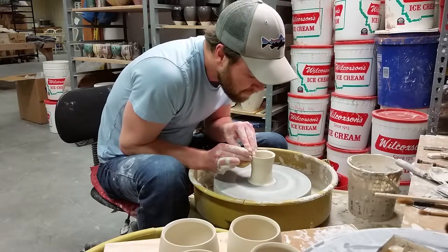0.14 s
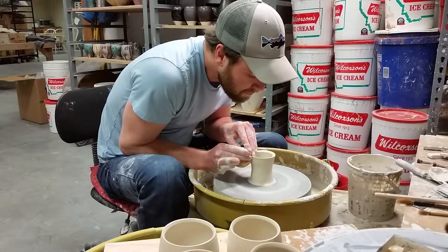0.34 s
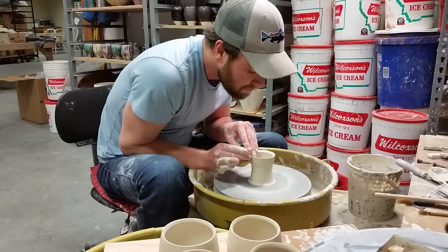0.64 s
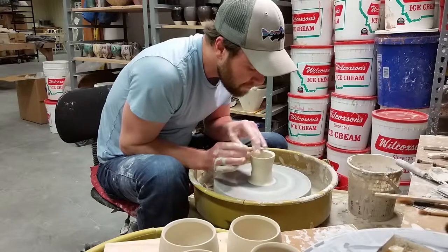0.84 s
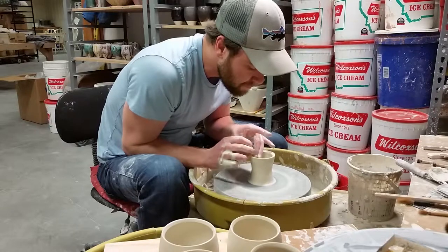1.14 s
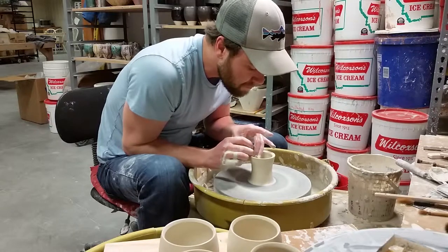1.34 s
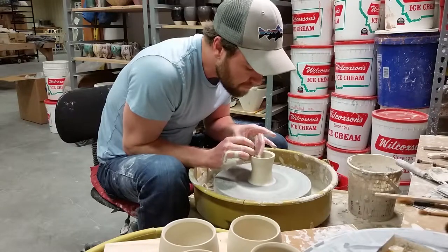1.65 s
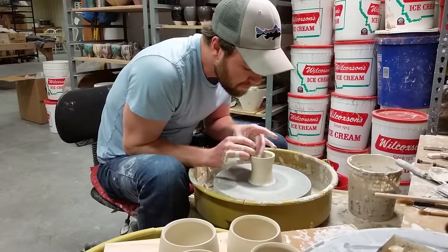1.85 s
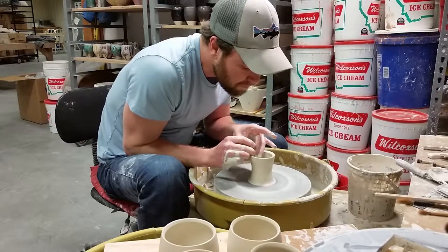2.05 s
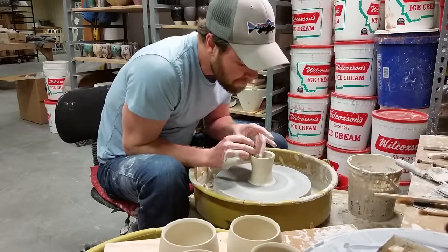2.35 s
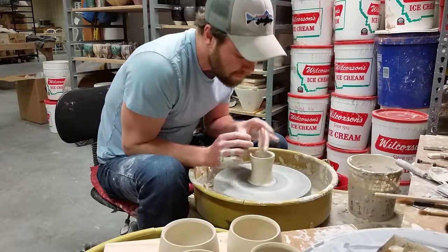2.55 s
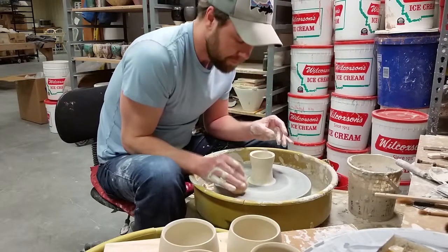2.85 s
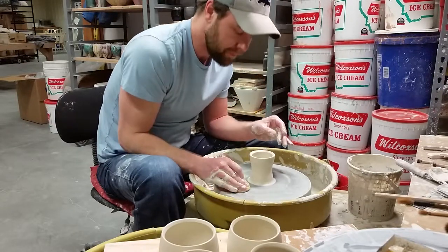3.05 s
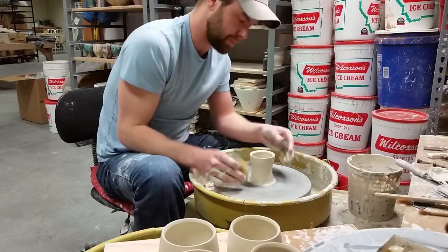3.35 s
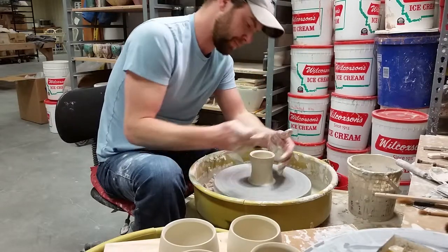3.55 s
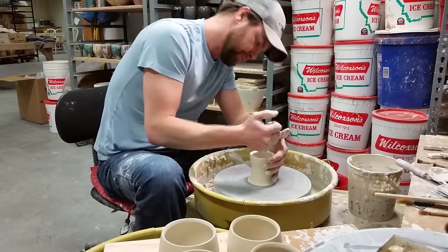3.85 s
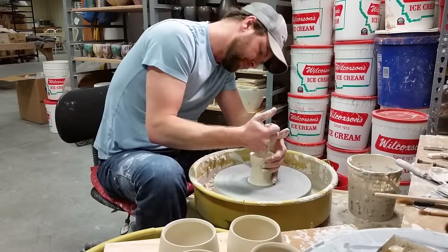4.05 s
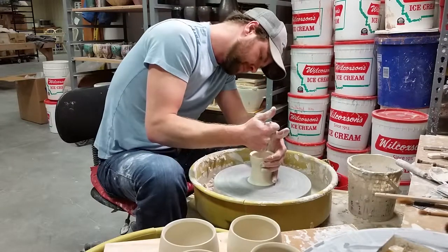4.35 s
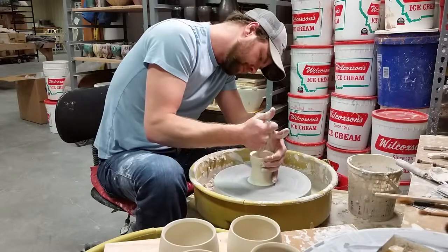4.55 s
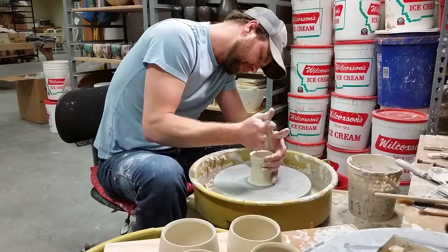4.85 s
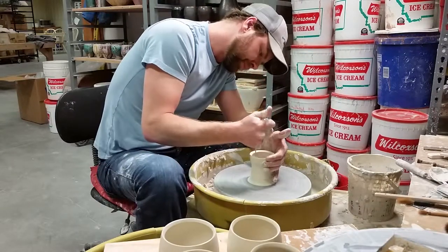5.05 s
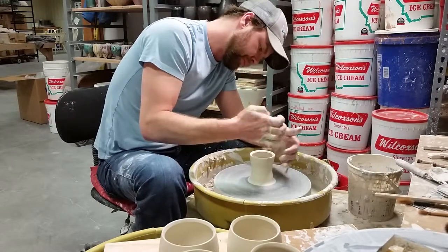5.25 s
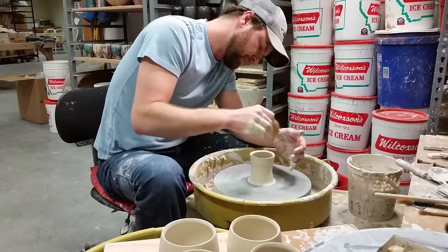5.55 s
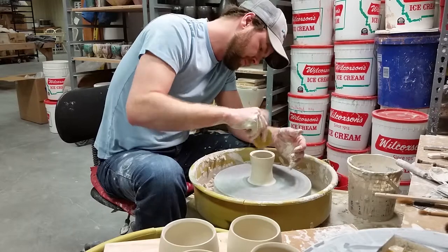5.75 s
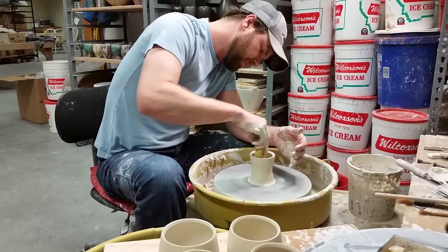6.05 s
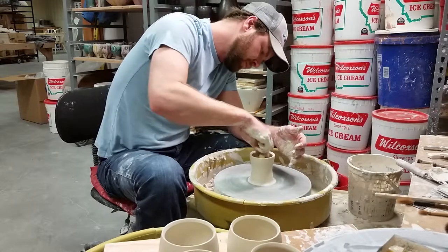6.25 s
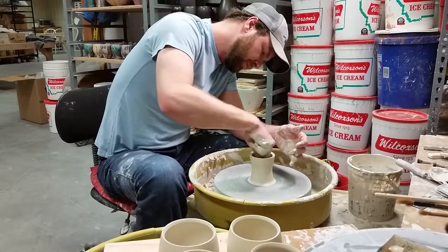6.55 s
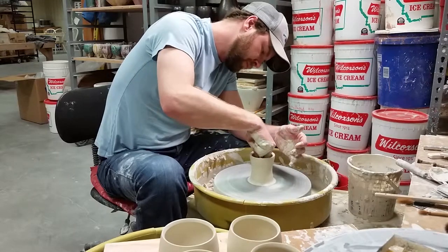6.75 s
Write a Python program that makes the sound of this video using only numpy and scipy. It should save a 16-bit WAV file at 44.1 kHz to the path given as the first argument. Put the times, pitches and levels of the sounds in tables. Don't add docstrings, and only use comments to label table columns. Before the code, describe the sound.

An electric pottery wheel runs throughout in a hard-floored studio, heard close in stereo. Its low hum sits around 150 Hz, with a steadier mid buzz near 375 Hz, weaker tones, soft brush and belt hiss, frame rumble and narrow housing resonance. From 0 to 2.5 seconds it holds nearly steady, the hum dipping briefly now and then. Between 2.5 and 3 seconds a thin whine near 1.2 kHz rises. Soft, airy wet strokes rub the clay at about 3.0, 3.2, 3.4 (strongest), 3.55, 3.85 and 4.2 seconds, with fine spray. From 3.7 to 5 the motor slows slightly, its pitch sagging by under a semitone. At 5.2 a tiny grainy squirt of water spurts and dies quickly. Until 6.9 the hum wavers in deeper pulses, hiss softens, and low rumbles swell near 5.2, 6.0 and 6.4. It ends still running.

```python
import sys
import numpy as np
from scipy import signal
from scipy.fft import rfft, irfft, next_fast_len
from scipy.io import wavfile

SR = 44100
rng = np.random.default_rng(int(sys.argv[2]) if len(sys.argv) > 2 else 0)


def transcribe(signal):
    frames = np.atleast_2d(signal).T
    limited = np.clip(frames, -1, 1)
    pcm = np.round(limited * 32767).astype(np.int16)
    wavfile.write(sys.argv[1], SR, pcm)


def rack_gain(trim_db):
    fader = np.asarray(trim_db, float)
    return 10 ** (fader / 20)


N = 304716
COARSE = 10

# time in seconds, speed in turns per second.
SHAFT_SPEED = [(0, 25.52), (.9, 25.52), (1.5, 25.46), (2.5, 25.43), (3.0, 25.4), (3.4, 25.46),
               (3.75, 25.28), (4.05, 25.13), (4.2, 25.0), (4.5, 24.6), (4.65, 24.46), (4.8, 24.37),
               (5.0, 24.31), (5.3, 24.28), (6.4, 24.29), (6.91, 24.33)]
STRONG_MULTIPLES = (6, 15, 48)
# left in dB, right in dB, lead of the right in radians.
STRONG_PICKUP = [(-2, 0.1, .42), (2, 2, 0.22), (-3.5, 6.5, 2.44)]
WEAK_MULTIPLES = (2, 4, 4.44, 5.17, 7, 8, 10, 11, 12, 13, 14, 16, 17, 19, 24, 27, 31, 32)
# left and right in dB at the fast speed, left and right in dB at the slow speed,
# lead of the right in radians.
WEAK_LEVELS = [(-80.5, -82.5, -85.5, -83.5, -1.3), (-63, -62.5, -72.5, -71, -0.03),
               (-69, -65.5, -83.5, -88, 0.4), (-71, -67.5, -79, -78.5, 0.4), (-64, -62, -84.5, -80, 0.6),
               (-69.5, -71.5, -75, -88, 0), (-90.5, -81.5, -86, -82.5, 0.6), (-70, -71, -81, -88, -0.9),
               (-79.5, -66, -75.5, -82.5, 0.5), (-76, -76.5, -81, -67.5, 2), (-67.5, -63, -81.5, -85, 0.6),
               (-68, -63.5, -68.5, -66.5, 1.4), (-84.5, -90.5, -82.5, -79, 2), (-81, -81, -92, -89.5, 2),
               (-92, -76, -97, -82, 1.06), (-86, -83, -83.5, -91, 1.3), (-99, -80.5, -92, -85, -.2),
               (-100, -89, -91, -78, 2.5)]
# time in seconds,
# change in dB.
DRIVE_EFFORT = [(0, -0.5), (.11, 1.5), (.46, -1.8), (.9, .5), (1.5, -.6), (2.05, -1), (2.6, 0), (3.18, 0.5),
                (3.7, 1), (4.2, 0), (4.68, -1.6), (4.94, -0.4), (5.05, -2.2), (5.46, -3.6), (5.95, -2),
                (6.27, -5.5), (6.5, -4), (6.91, -2.5)]
# time in seconds, change in dB, half width in seconds.
HUM_DIPS = [(.44, -5.5, 0.058), (.75, -1, 0.25), (1.25, -5.5, 0.023), (1.35, -2, 0.1), (1.58, -2.5, 0.12),
            (1.91, -6, .08), (2.15, -3.5, .035), (2.3, -4, 0.072), (2.66, -6, 0.023), (2.9, -3.5, 0.12),
            (3.22, 0.5, 0.053), (3.41, -5, 0.029), (3.81, -3, .04), (3.97, -2, 0.044), (4.23, -4, 0.026),
            (4.33, -3.5, .025), (4.5, -6, 0.027), (4.68, -8, 0.037), (5.01, -9, 0.056), (5.24, -5, 0.054),
            (5.39, -8, .06), (5.53, -7, .08), (5.74, -11, 0.033), (6.08, -11.5, 0.032),
            (6.25, -10, 0.042), (6.54, -9.5, 0.059), (6.81, -7, 0.036), (6.9, -2, .04)]
# time in seconds, change in dB, half width in seconds.
HUM_SWELLS = [(.1, 1, 0.088), (3.34, 3.5, 0.055), (4.1, 2.5, 0.064), (4.42, 2, .05), (4.85, 2.5, .12),
              (5.14, 2.5, 0.045), (5.66, 0.5, 0.037), (5.93, 2.5, 0.085), (6.43, 2, .08), (6.7, 3, 0.042)]
# frequency in Hz, level in dB.
SLOT_ROOM = [(364, -60.5), (366, -64.5), (367.5, -65), (369.3, -81), (371.5, -65), (373.3, -75), (375, -58),
             (381, -55.5)]
# time in seconds, change in dB, half width in seconds.
WHINE_PINCHES = [(3.0, -2.5, .25), (3.4, -7, .12), (4.4, -3, .2), (5.6, -3, .2)]
# peak time in seconds, change in dB,
# rise in dB per second, fall in dB per second.
HAND_STROKES = [
    (3.03, -11, 197, 30),
    (3.2, -7, 42, 40),
    (3.36, 2.1, 36.5, 59.5),
    (3.55, -9.5, 40, 31),
    (3.85, -13.5, 40, 63),
    (4.2, -9.5, 39, 30.5),
]
# frequency in Hz, left in dB per Hz, right in dB per Hz.
SKIN_COLOUR = [(5000, -124, -106), (5800, -124, -108), (6350, -124, -107), (6800, -125, -114),
               (7800, -124, -109), (8400, -122, -111), (9500, -121, -120), (11050, -111, -116),
               (12500, -106, -112), (14000, -110, -112), (15500, -112, -113)]
# frequency in Hz, left in dB per Hz, right in dB per Hz.
SQUEEZE_COLOUR = [(5000, -132, -117), (6500, -136, -124), (8000, -138, -125), (9500, -134, -130),
                  (11000, -121, -124), (12500, -108, -116), (14000, -110, -115), (15000, -124, -126)]
# frequency in Hz, left in dB per Hz, right in dB per Hz.
SPRAY_COLOUR = [(5800, -134, -130), (6300, -132, -126), (6800, -132, -131), (7500, -132, -128),
                (8150, -131, -128), (9800, -132, -133), (10600, -127, -131), (11200, -120, -124),
                (12100, -115, -119), (14000, -116, -117), (15600, -117, -117)]
# time in seconds, change in dB, half width in seconds.
SPRAY_FLICKS = [(3.85, 3.3, 0.037), (4.15, 2.5, .08), (4.3, 1.5, .1)]
# frequency in Hz, left in dB per Hz, right in dB per Hz.
HISS_COLOUR = [(477, -93.5, -89), (704, -99.5, -91), (1050, -101, -96.5), (1394, -109, -104),
               (1720, -112, -111), (2214, -108, -93.5), (2680, -114, -109), (3000, -115, -105),
               (3120, -115, -108), (3520, -110, -90), (4184, -111, -86.5), (4990, -120, -100),
               (5680, -127, -112), (5980, -134, -127)]
# frequency in Hz, left in dB per Hz, right in dB per Hz.
RUMBLE_COLOUR = [(25, -102, -102), (40, -100.5, -95.5), (55, -86.5, -90.5), (75, -87, -95.5),
                 (89.6, -86, -92), (111, -78.5, -75), (128, -79, -77.5), (144, -76.5, -76.5),
                 (171, -82, -82.5), (182, -85, -79), (254, -90.5, -91.5), (300, -88.5, -84.5),
                 (347, -87, -76.5), (436, -94.5, -92.5)]
# time in seconds, change in dB, half width in seconds.
FRAME_JOLTS = [(4.3, -2, 0.17), (5.2, 3.5, 0.09), (6.0, 5.5, .1), (6.42, 5, .08), (6.75, 2.5, .07)]
# frequency in Hz, width in Hz, left in dB, right in dB.
HOUSING_RINGS = [(115.7, 4.1, -71.5, -68.5), (178.6, 5.1, -74, -70), (282, 6, -74, -69.5),
                 (335, 8, -77.5, -75.5), (491.4, 12, -81.5, -79.5), (1029, 22, -84, -79),
                 (12500, 65, -90, -108), (14420, 120, -94, -104)]
# frequency in Hz, left-right likeness from -1 to 1.
MIC_LIKENESS = [(60, 0.24), (130, 1), (290, 0.32), (640, -0.069), (1410, -0.042), (3100, 0.073),
                (6820, -0.54), (15000, 0.22)]


def motor(drive_db):
    fast_hz, slow_hz = 24.903, 24.77
    full_speed = in_time(SHAFT_SPEED)[0]
    speed = full_speed[::COARSE]
    turn = 2 * np.pi * np.cumsum(speed) * COARSE / SR
    slowed = np.clip((fast_hz - speed) / (fast_hz - slow_hz), 0, 1)
    hum_multiple = STRONG_MULTIPLES[0]
    run_ahead = -.09 * swells(HUM_DIPS)[::COARSE] / hum_multiple
    levels = strong_levels(full_speed, drive_db)
    out = 0
    for multiple, (left_db, right_db, lead), level_db in zip(STRONG_MULTIPLES, STRONG_PICKUP, levels):
        angle = turn + run_ahead * (multiple == hum_multiple)
        out = out + rack_gain(level_db[::COARSE]) * tone(angle, multiple, left_db, right_db, lead, wobble=.06)
    for multiple, (left_db, right_db, slow_left_db, slow_right_db, lead) in zip(WEAK_MULTIPLES, WEAK_LEVELS):
        flutter_db = 1.2 * drift(3.4)[::COARSE]
        left = left_db + slowed * (slow_left_db - left_db) + flutter_db
        right = right_db + slowed * (slow_right_db - right_db) + flutter_db
        out = out + tone(turn, multiple, left, right, lead, wobble=0.15)
    smooth = signal.resample_poly(out, COARSE, 1, axis=1, window=("kaiser", 10), padtype="line")
    return smooth[:, :N]


def strong_levels(speed, drive_db):
    t = np.arange(N) / SR
    hum = -46.5 + 0.22 * drive_db + swells(HUM_DIPS) + swells(HUM_SWELLS)
    slots = np.interp(15 * speed, *np.transpose(SLOT_ROOM))
    slots = slots + 0.65 * drive_db + .8 * drift(5.0)
    faint_db, full_db, from_s, rise_s = -92, -78.5, 2.5, 0.46
    whine = faint_db + (full_db - faint_db) * np.clip((t - from_s) / rise_s, 0, 1)
    whine = whine + swells(WHINE_PINCHES) + 2.0 * drift(4.0)
    return hum, slots, whine


def tone(turn, multiple, left_db, right_db, lead, wobble):
    spread = .04 * (multiple - 15) ** 3
    phase = multiple * turn + spread + wobble * drift(4.3)[::COARSE]
    left, right = rack_gain(left_db) * np.sin(phase), rack_gain(right_db) * np.sin(phase + lead)
    return np.sqrt(2) * np.array([left, right])


def rub(rub_db):
    return rack_gain(rub_db) * stereo_noise(SKIN_COLOUR, shared_db=-0.3, own_db=1.2, rate=25.0, count=4)


def strokes_db():
    t = np.arange(N) / SR
    power = 0
    for s, db, rise, fall in HAND_STROKES:
        power = power + rack_gain(2 * (db - np.maximum(rise * (s - t), fall * (t - s))))
    first_s, _, first_rise, _ = HAND_STROKES[0]
    before = np.maximum(first_s - t, 0) * first_rise
    lift_s, lift_db_per_s = 4.7, 61
    return 10 * np.log10(power) - before - lift_db_per_s * np.maximum(t - lift_s, 0)


def squeeze():
    return rack_gain(squeeze_db()) * stereo_noise(SQUEEZE_COLOUR, shared_db=-0.5, own_db=4.5, rate=60.0, count=2)


def squeeze_db():
    start_s, attack_s, peak_db = 5.221, .006, 4.5
    spurt_s, spurt_db, trickle_db_per_s = .022, 6, 70
    t = np.arange(N) / SR - start_s
    spurt = spurt_db * np.clip((t - spurt_s) / attack_s, 0, 1)
    drop = np.where(t < 0, -40 * t / attack_s, trickle_db_per_s * t + spurt)
    return np.maximum(peak_db - drop, -120)


def spray(drive_db, rub_db):
    level_db = 1.2 * drive_db + swells(SPRAY_FLICKS) + .9 * rack_gain(rub_db)
    return rack_gain(level_db) * stereo_noise(SPRAY_COLOUR, shared_db=0.3, own_db=0.2, rate=12.0, count=2)


def hiss(drive_db):
    return rack_gain(drive_db) * stereo_noise(HISS_COLOUR, shared_db=0.46, own_db=0.69, rate=7.0, count=5)


def rumble(drive_db):
    level_db = .8 * drive_db - 0.63 + swells(FRAME_JOLTS)
    frame = stereo_noise(RUMBLE_COLOUR, shared_db=-0.73, own_db=-0.3, rate=3.0, count=3)
    return rack_gain(level_db) * (housing() + frame)


def housing():
    out = 0
    for hz, width_hz, left_db, right_db in HOUSING_RINGS:
        r = np.exp(-np.pi * width_hz / SR)
        poles = [1, -2 * r * np.cos(2 * np.pi * hz / SR), r * r]
        ring = signal.lfilter([1, 0, -1], poles, rng.standard_normal(N))
        out = out + ring / ring.std() * rack_gain(np.array([[left_db], [right_db]]))
    return out


def stereo_noise(colour, shared_db, own_db, rate, count):
    size = next_fast_len(N)
    hz = np.maximum(np.arange(size // 2 + 1) * SR / size, 1)
    at, left_db, right_db = np.transpose(colour)
    like_hz, likeness = np.transpose(MIC_LIKENESS)
    alike = np.clip(np.interp(np.log(hz), np.log(like_hz), likeness), -1, 1)
    mid, side = rfft(rng.standard_normal((2, size)))
    pair = np.sqrt((1 + alike) / 2) * mid + np.sqrt((1 - alike) / 2) * side * [[1], [-1]]
    colour_db = np.array([np.interp(np.log(hz), np.log(at), db) for db in (left_db, right_db)])
    pair = pair * np.sqrt(SR / 2) * rack_gain(colour_db)
    octaves_outside = np.maximum(np.log2(at[0] / hz), 0) + np.maximum(np.log2(hz / at[-1]), 0)
    pair = pair * rack_gain(-40 * octaves_outside)
    pair[0] *= np.exp(-2j * np.pi * hz * .00025)
    place = (count - 1) * np.log(hz / at[0]) / np.log(at[-1] / at[0])
    place = np.clip(place, 0, count - 1)
    out, together = 0, drift(rate / 4)
    for k in range(count):
        share = np.clip(1 - np.abs(place - k), 0, 1)
        band = irfft(pair * share, size)[:, :N]
        out = out + band * rack_gain(shared_db * together + own_db * drift(rate))
    return out


def in_time(rows):
    s, *columns = np.transpose(rows)
    return [np.interp(np.arange(N) / SR, s, c) for c in columns]


def swells(rows):
    t = np.arange(0, N, COARSE) / SR
    db = sum(change_db * np.exp(-((t - s) / width) ** 2) for s, change_db, width in rows)
    return np.interp(np.arange(N) / SR, t, db)


def drift(rate):
    r = np.exp(-80 * np.pi * rate / SR)
    slow = signal.lfilter([1], [1, -2 * r, r * r], rng.standard_normal(N // 40 + 2002))[2000:]
    return np.interp(np.arange(N) / 40, np.arange(len(slow)), slow / slow.std())


def scene():
    drive_db = in_time(DRIVE_EFFORT)[0]
    rub_db = strokes_db()
    hands = rub(rub_db) + squeeze() + spray(drive_db, rub_db)
    return motor(drive_db) + hands + hiss(drive_db) + rumble(drive_db)


def roll_off(x):
    return signal.sosfilt(signal.butter(12, 15730, fs=SR, output="sos"), x)


def record(dry):
    mix = dry - .0005
    return roll_off(mix)


dry = scene()
out = record(dry)
transcribe(out)
```